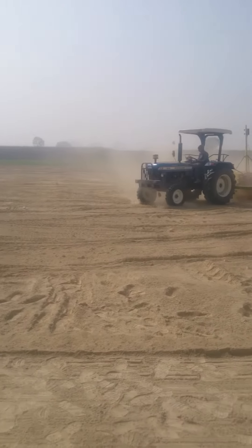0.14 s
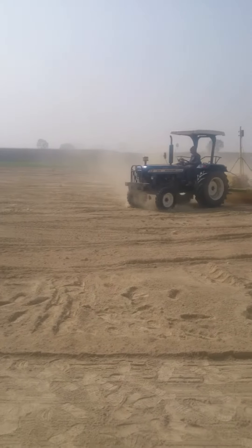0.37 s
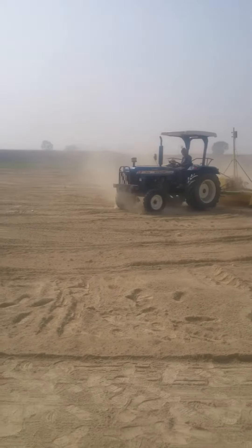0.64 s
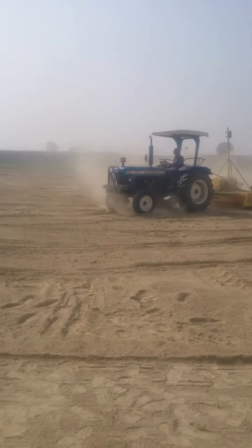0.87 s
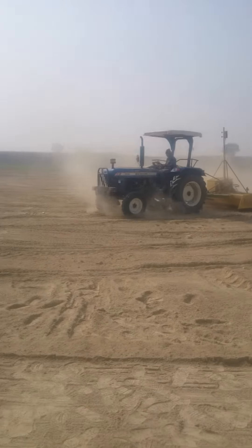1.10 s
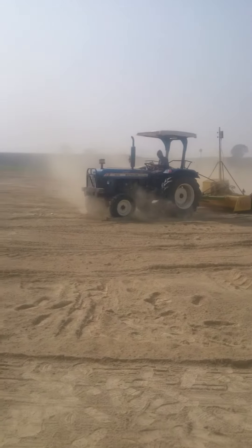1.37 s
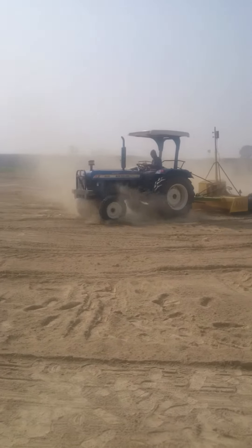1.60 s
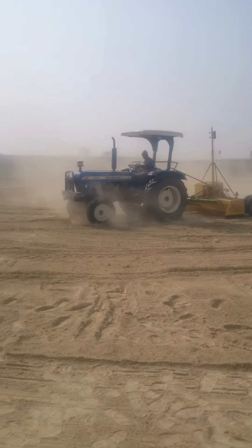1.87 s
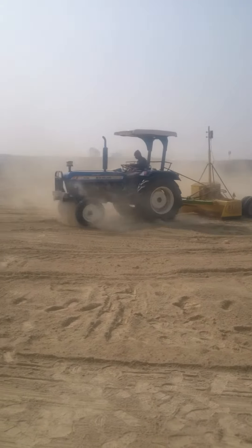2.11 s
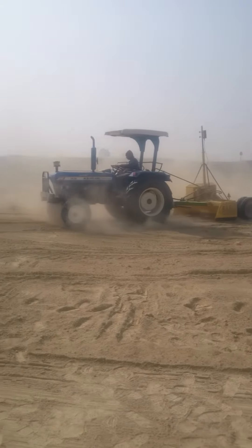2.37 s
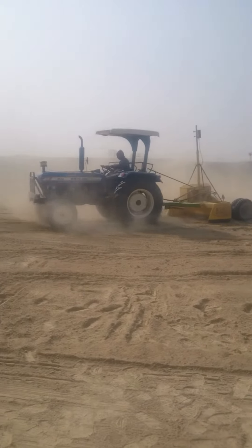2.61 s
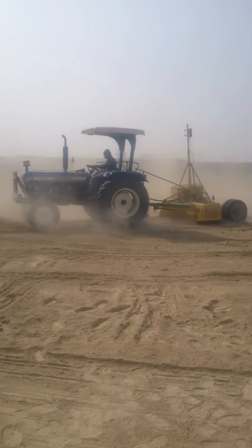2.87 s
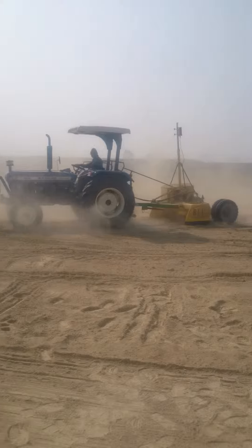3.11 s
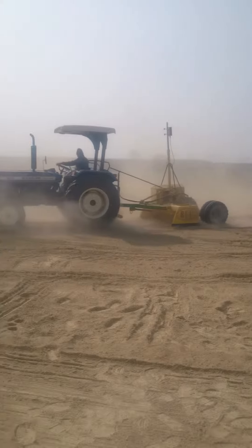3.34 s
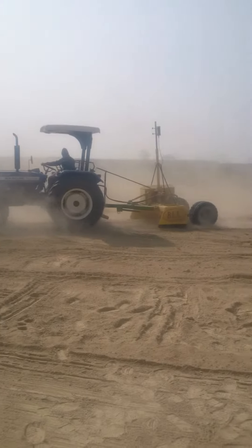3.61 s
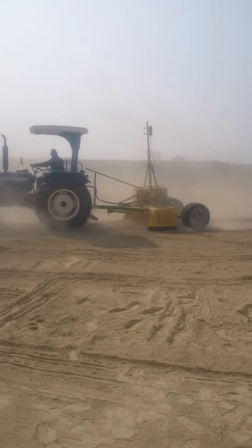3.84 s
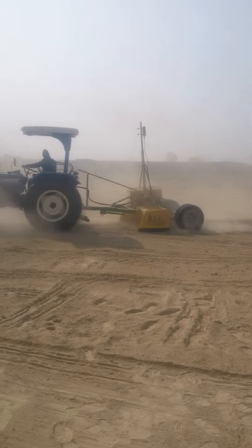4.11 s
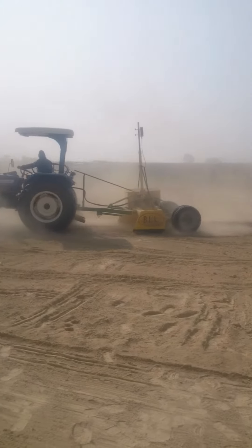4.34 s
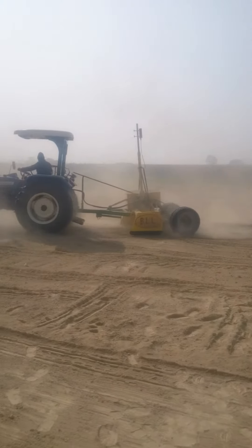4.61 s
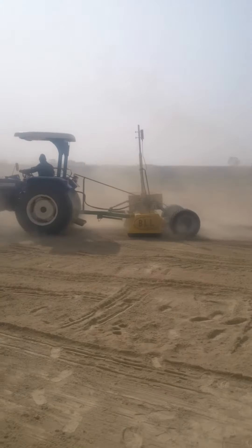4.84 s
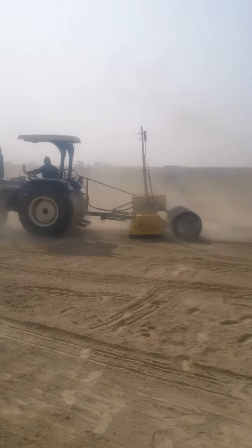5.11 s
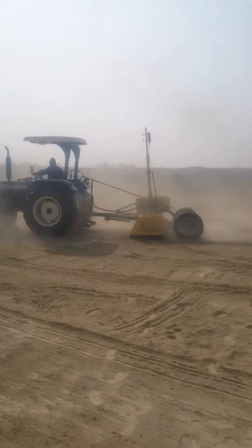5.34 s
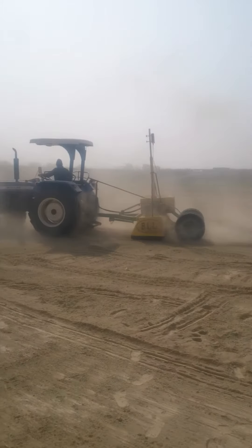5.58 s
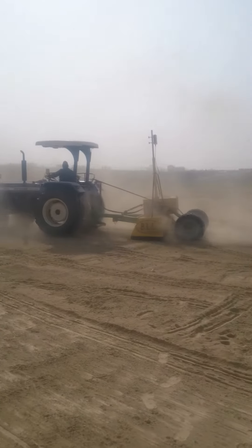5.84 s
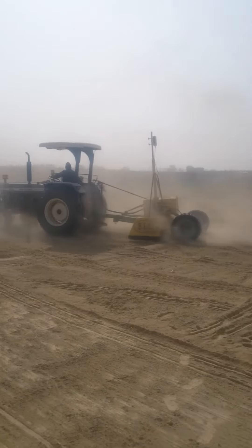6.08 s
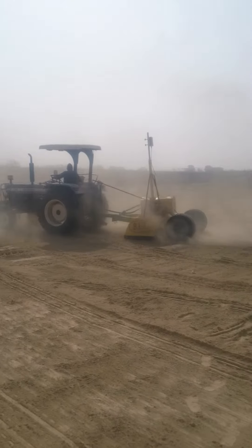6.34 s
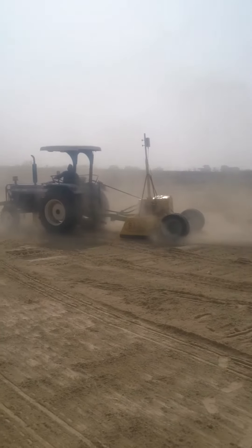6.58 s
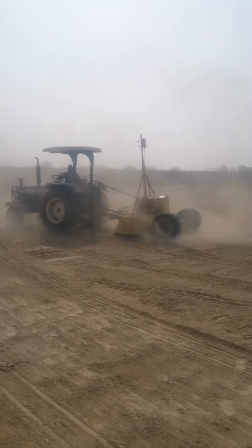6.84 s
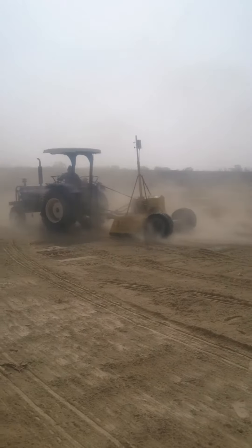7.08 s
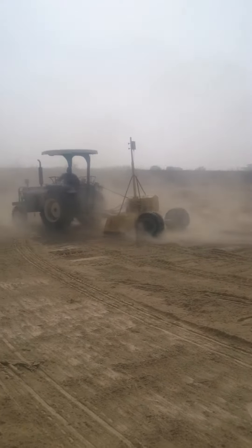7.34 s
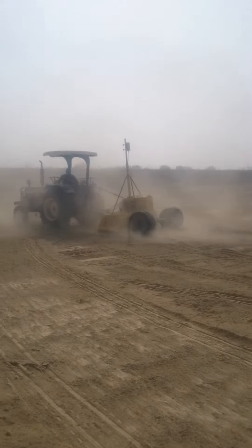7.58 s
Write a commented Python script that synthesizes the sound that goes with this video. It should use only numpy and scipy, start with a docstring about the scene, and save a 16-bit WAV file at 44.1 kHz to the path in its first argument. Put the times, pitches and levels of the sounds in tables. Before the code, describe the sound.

Low wind rumble and blunt buffets dominate the right channel, while the left holds a clearer, quieter tractor. Its diesel engine chatters quickly and evenly under load, with a droning exhaust tone, ringing panels and thin gear whine strongest as it passes in the middle. The wind lulls there, then builds again as the tractor turns away, its hitch pins clinking. Handheld stereo microphone, dry open air.

```python
"""Tractor drive-by in wind

A three-cylinder diesel tractor drags a levelling blade past across an open field.
Clatter: noise pulsed by each firing, coloured by ringing panels. Engine-locked tones and gear whines: sines.
Hitch clinks: clusters of decaying sines. Wind: noise read at air speed, plus short slaps of air.
Two microphone ports hear it, the right far more exposed to wind; a limiter rounds the peaks."""
import sys
import numpy as np
from scipy import signal
from scipy.fft import rfft, irfft
from scipy.io import wavfile
from scipy.ndimage import uniform_filter1d, minimum_filter1d

SR = 44100
rng = np.random.default_rng(int(sys.argv[2]) if len(sys.argv) > 2 else 0)


def invert_db(level):
    """Linear amplitude ratio for a level in decibels (20 dB per decade), elementwise."""
    return 10 ** (np.asarray(level, dtype=float) / 20)


def transcribe(u):
    """Save the signal u as a 16-bit wav file named by the first command-line argument.

    u: samples, shape (n,) or (channels, n), limited to [-1, 1]; the rate is SR.
    q: integer samples, one column per channel.
    """
    v = np.clip(np.atleast_2d(u).T, -1, 1)
    q = np.round(v * 32767).astype(np.int16)
    wavfile.write(sys.argv[1], SR, q)


N = 339570
T = np.arange(N) / SR  # s

# engine speed, sinking as the tractor passes: t/s, four-stroke cycles per second/Hz
ENGINE_SPEED = [(0, 15.56), (.6, 15.55), (1.1, 15.47), (2, 15.448), (3.5, 15.435), (4.5, 15.405),
                (5.5, 15.375), (6.1, 15.34), (6.6, 15.305), (7.7, 15.31)]
# mean strength of each cylinder's firing: level/dB
CYLINDER_DB = [-3, -1, -1.5]
# loud engine-locked tones, exhaust orders 6, 9, 12 and a fan or gear whine at 32:
# multiple of the engine cycle
LOUD_MULTIPLES = [6, 9, 12, 32]
# lobe of each loud multiple sweeping the listener:
# arriving level/dB, leaving level/dB, swell/dB, lobe t/s, half-width/s
LOBES = [(-25, -27, 3, 4.7, 1.0), (-40, -42, 9.5, 3.5, 2.0), (-42, -41.5, 9, 3.1, 1.1),
         (-48, -54, 14.5, 3.5, .9)]
# weaker engine-locked tones: multiple of the engine cycle, level/dB
WEAK_MULTIPLES_DB = {11: -44, 15: -44, 18: -47, 21: -54, 26: -52, 27: -64, 30: -54, 36: -56, 39: -61, 42:
                     -60, 48: -53, 52: -59, 56: -59, 66: -61, 72: -57, 74.67: -57}
# common gain of the weaker multiples as the tractor turns: t/s, level/dB
WEAK_FACING = [(0, -6), (1.2, -4), (2.2, 1), (4.8, 1), (6, -2), (6.6, -6), (7.7, -7)]
# gear whines: f/Hz, level/dB, loudest t/s, half-width/s
GEAR_WHINES = [(1235, -60, 2.1, .5), (1365, -57, 3.4, 1.6), (1790, -59, 3.2, 1.2), (825, -55, 3.4, 1.3)]
# body panels that ring while facing the listener:
# arriving f/Hz, leaving f/Hz, width/Hz, level/dB, facing t/s, half-width/s
PANELS = [(760, 745, 13, 5, 3.8, 1.7), (846, 835, 29, 5, 3.97, 1.2), (980, 950, 35, 8.5, 4.59, 2.2),
          (1170, 1167, 13, 8, 0.95, 1.55), (1206, 1300, 37, 6.5, 2.1, 0.46),
          (1385, 1310, 36, 6.5, 5, 2.205), (1536, 1400, 35, 8, 0.73, 1.3), (1700, 1820, 42.1, 5, 3.9, 1.6),
          (2150, 2170, 34, 13, 6.24, 2), (2450, 1530, 40, 2.5, 6.3, 1.097),
          (2560, 2796, 86, 5.5, 3.8, 0.92), (2600, 3400, 360, 7, 0.091, 0.53),
          (2810, 2770, 50, 6, 6.1, 2.71), (3146, 3080, 27, 9.5, 2.3, 0.91), (3338, 3290, 76, 6.5, 5.9, 1.2),
          (2610, 2620, 60.4, 4, 2.3, .6), (3630, 3650, 72, 5.5, 2.3, .9)]
# clatter colour change from nose to tail: f/Hz, level/dB
NOSE_TO_TAIL = [(700, -1), (1250, -3.5), (1900, -1.5), (2700, 1), (5000, 0), (9000, -0.5)]
# hitch clinks: t/s, level/dB, gain of rings above 6 kHz/dB, hardest-struck f/Hz
CLINKS = [(0.059, -32.5, 11.5, 3750), (2.034, -33, 0, 3300), (2.5557, -33, 0, 3100), (4.0503, -37, 0, 3500),
          (5.8584, -31.5, -2.5, 3750), (6.4768, -31.5, 3, 3400), (7.2479, -32.5, 6, 3300),
          (7.269, -31, 0, 2900), (7.364, -24, -4, 3560), (7.381, -28, -6, 3293)]
# rings of the hitch pins: f/Hz, level/dB, 60 dB decay time/s
HITCH_RINGS = [(2790, 2, 0.06), (3120, 0, 0.05), (3330, -2, 0.09), (3480, -3, .05), (3670, 2, 0.077),
               (3800, -3, 0.062), (4500, -4, .025), (4870, -3, .03), (6570, -15, .04), (6870, -13, 0.088),
               (7680, -26, .04), (11300, -28, .04)]
# colour of the clatter at each port: f/Hz, level/dB
LEFT_PORT = [(90, 2.5), (300, 1), (500, 5), (700, -4.5), (820, 2), (1050, 2), (1440, 2), (1870, -2),
             (2560, -1), (2850, -4.5), (3150, -1.5), (3400, -3), (4900, -5), (5400, -16.5), (6870, -13),
             (7750, -16.5), (8960, -10.5), (10110, -19.5), (11680, -32), (15600, -34)]
RIGHT_PORT = [(90, 5), (300, 6), (500, 7), (740, 5), (900, 1), (1150, 8), (1370, 7.5), (1550, -1.5),
              (1760, 8), (2010, -0.5), (2160, 3), (2750, 3.5), (3050, 2), (3860, 0), (4560, -9.5),
              (5530, -18.5), (7390, -20), (9180, -23), (12550, -22), (15600, -27.5)]
# phase by which left leads beyond the travel delay: f/Hz, phase/rad
LEFT_LEAD = [(60, 3.0), (500, 2.1), (650, 1.9), (750, 3.3), (850, 2.7), (950, 1.2), (1050, 1.85),
             (1450, 2.3), (1650, 1.0), (1900, 2.9), (2050, 5.9), (2250, 6.8), (3000, 6.4), (4300, 6.2),
             (5300, 4.9), (7000, 4.5)]
# left-right likeness of the clatter: f/Hz, share/1
LIKENESS = [(400, 0.98), (1200, 0.92), (1900, 0.57), (2600, 0.75), (4700, 0.59), (5700, 0.28), (9000, 0.08),
            (15000, 0.22)]
# stretch of the right port's spectrum as the tractor swings round: t/s, frequency factor/1
RIGHT_SLIDE = [(0, 0.96), (2, 0.98), (3.2, 0.98), (5, 1.025), (7.7, 1)]
# slaps of air on the right port: peak t/s, level/dB, f/Hz
SLAPS = [(0.0308, -3.5, 287), (0.1072, -11.5, 308), (0.1443, -15, 430.0), (0.158, -6.5, 169),
         (0.3158, -10.5, 169), (0.38, -11.5, 230.6), (0.449, -9.5, 210.0), (0.549, -8, 325.9),
         (0.6557, -9.5, 228), (0.6977, -2, 222.1), (0.8047, -7, 308), (0.8753, -8, 279.5),
         (0.9358, -10, 420.2), (0.9436, -5.5, 169), (0.9983, -4, 255), (1.015, -5, 249.2),
         (1.0378, -4, 169.7), (1.0533, -9.5, 400.0), (1.0828, -3, 250.0), (1.1176, -12, 308),
         (1.1284, -6, 230.0), (1.1414, -9, 380.0), (1.16, -2.5, 171), (1.1839, -8, 229.8),
         (1.1967, -11, 388), (1.3467, -4.5, 246), (1.381, -11, 419), (1.414, -12, 376), (1.4601, -4, 379.7),
         (1.5147, -5.5, 310.4), (1.53, -4, 250.3), (1.59, -4.5, 274), (1.6356, -8, 247.8),
         (1.7046, -5, 249.8), (1.744, -6.5, 230.3), (1.8133, -12, 335), (1.8257, -10, 169.9),
         (1.886, -13, 309.5), (1.9118, -7.5, 205.2), (2.5057, -8.5, 308), (2.6237, -8, 172),
         (2.6552, -11.5, 306), (2.916, -5.5, 169), (2.9599, -8, 229), (3.079, -9.5, 190.3),
         (3.7135, -11.5, 330), (4.5078, -11, 169.9), (4.8326, -8, 615.4), (4.836, -8.5, 170),
         (4.876, -12, 376), (4.938, -11, 234), (4.9926, -8, 230.4), (5.0116, -15, 620.0),
         (5.1043, -6.5, 373), (5.1181, -6.5, 455), (5.1743, -4, 251), (5.1887, -12, 379),
         (5.269, -11, 510.4), (5.293, -9, 249.4), (5.3082, -7, 310.0), (5.3806, -12, 283),
         (5.5685, -12, 468), (5.5849, -11, 381.7), (5.5953, -14, 419), (5.6604, -6, 457),
         (5.7002, -7.5, 520), (5.7242, -10, 421.3), (5.7405, -7.5, 314), (5.7582, -8.5, 169.6),
         (5.7954, -7, 230.0), (5.8346, -9, 207.9), (5.8369, -14, 559.6), (6.009, -8, 340),
         (6.0355, -5, 245), (6.1114, -11, 169.3), (6.1288, -17, 459.7), (6.1565, -11.5, 381),
         (6.2263, -8, 246.1), (6.243, -12, 312), (6.2642, -12, 309), (6.3864, -7.5, 382.2),
         (6.4132, -8.5, 280.7), (6.4962, -4, 209.7), (6.5091, -8.5, 281), (6.5484, -12, 419.3),
         (6.5668, -5, 280.0), (6.5834, -6, 519.6), (6.5976, -5, 372), (6.6663, -6.5, 420.4),
         (6.6995, -2, 169), (6.7336, -7, 280.3), (6.7924, -4.5, 341.6), (6.8242, -2.5, 224.2),
         (6.8817, -15, 429), (6.9134, -6.5, 509), (6.951, -20, 450.5), (6.969, -4, 280.0),
         (6.975, -12.5, 521), (7.004, -15, 339.8), (7.044, -10.5, 559.4), (7.085, -15, 400.0),
         (7.1024, -3, 421.3), (7.1256, -14, 620.0), (7.17, -12.5, 419.6), (7.1857, -6.5, 519.4),
         (7.2265, -6, 336), (7.253, -8, 210.4), (7.2696, -7, 305), (7.3074, -12, 379.6),
         (7.3181, -6, 249.4), (7.345, -8, 380.0), (7.362, -10, 337.5), (7.4951, -5, 327.4),
         (7.5604, -13.5, 380), (7.579, -9, 369), (7.596, -7.5, 173)]
# puffs of stronger wind at the right port: peak t/s, level/dB, length/s
PUFFS = [(0.022, -11.5, 0.045), (0.115, -11, 0.063), (0.321, -14, 0.04), (0.375, -14, 0.035),
         (0.449, -12.5, 0.043), (0.538, -13, 0.027), (0.611, -14, 0.039), (0.693, -12, 0.064),
         (0.94, -12, 0.043), (1.138, -10.5, 0.097), (1.379, -10.5, 0.061), (1.519, -10, 0.044),
         (1.599, -10.5, 0.0505), (1.736, -14, 0.049), (1.814, -10, 0.043), (1.899, -14, 0.047),
         (2.433, -18, .04), (2.506, -14, 0.051), (2.619, -13, 0.038), (2.665, -14, 0.041),
         (2.951, -12, .11), (3.109, -15.5, 0.066), (3.228, -18.5, 0.059), (3.35, -18, 0.073),
         (3.643, -16.5, 0.039), (3.725, -15, 0.07), (3.899, -17, 0.075), (4.064, -14, .03),
         (4.322, -18, 0.046), (4.507, -18, 0.049), (4.99, -15, 0.049), (5.124, -13, 0.0509),
         (5.188, -13, 0.0409), (5.289, -14, 0.049), (5.371, -13, 0.085), (5.597, -13, 0.063),
         (5.747, -10, 0.05), (5.839, -15, 0.04), (6.103, -12, 0.1), (6.26, -14.5, 0.062),
         (6.418, -14, 0.063), (6.713, -12.5, 0.071), (6.971, -11, 0.099), (7.183, -10.5, 0.057),
         (7.321, -14, 0.047), (7.493, -11, 0.034), (7.586, -8.5, 0.033)]
# breeze under the puffs: t/s, right port level/dB, sheltered left port level/dB
BREEZE = [(0, -17, -31), (.3, -15.5, -36), (.74, -17, -35), (.77, -24, -35), (.83, -12, -33),
          (1.2, -11, -28), (1.28, -18, -35), (1.6, -13, -27.5), (1.95, -15.5, -34), (2.05, -23, -34.5),
          (2.75, -22, -34), (3.4, -21, -31), (3.85, -20.5, -27.5), (4.79, -24, -26), (4.84, -15.5, -27),
          (5.07, -19, -27), (5.7, -14, -29.5), (5.9, -17.5, -33.5), (6.3, -16.5, -27), (6.5, -13, -28.5),
          (7.3, -13, -29), (7.42, -21, -30), (7.7, -20, -31)]
# spectrum of the eddies passing at unit speed, relative: f/Hz, level/dB
EDDIES = [(15, -8), (40, -6), (62, 3), (110, 2), (200, -6.5), (350, -16.5), (600, -29), (1000, -45),
          (2000, -79)]

START_CYCLES, HUNT_SHARE = .93, .0012  # place in the cycle at t = 0; governor hunting, rms of speed
CLOSEST_S, CLOSEST_DB = 3.51, -32.5
CROSSING_S = 3.5  # time to drive the closest distance
WHINE_WANDER_SHARE, WHINE_BLUR_SHARE = .008, .003  # slow and quick, rms of pitch
STRIKE_REACH_HZ, STRIKE_FALL_DB = 450, -8.5  # rings far from the struck pitch are weaker
RIGHT_DELAY_S = 14 / SR
SLAP_SIGMA_CYCLES, WAKE_CYCLES = .48, 2.5  # wake dies by 1/e in WAKE_CYCLES
PUSH_SHARE, WAKE_SHARE = .78, .2
RISE_SHARE, FALL_SHARE = .45, .55  # of puff length
ROAR_DB, ROAR_DB_PER_DB = -24.5, 1.5  # level in a -15 dB gust; growth with the gust
LEE_WAVER_DB = 1.55  # rms


def evened(x):
    """Scales to rms 1."""
    return x / np.sqrt(np.mean(x ** 2) + 1e-20)


def read(points, hz):
    """Reads a spectrum table on a log-frequency axis."""
    f, value = np.transpose(points)
    return np.interp(np.log(hz + 1), np.log(f + 1), value)


def curves(rows):
    """One signal per column of a time table."""
    s, *columns = np.transpose(rows)
    return [np.interp(T, s, c) for c in columns]


def add(mix, start_s, sound):
    """Mixes a sound in at start_s."""
    part = mix[round(start_s * SR):][:len(sound)]
    part += sound[:len(part)]


def wander(fastest_hz, slowest_hz):
    """Slow chance, rms 1: sines of random phase, weaker towards fastest_hz."""
    t = np.arange(0, N / SR + .01, .001)
    f = np.geomspace(slowest_hz, fastest_hz, num=40)[:, None]
    sines = np.sin(2 * np.pi * (f * t + rng.random(f.shape)))
    return np.interp(T, t, evened((sines / np.sqrt(f)).sum(0)))


def at_ports(hz, db, turns):
    """Tone near hz, delayed, phase-shifted and coloured at the right port; db is the left rms."""
    lag = read(LEFT_LEAD, hz) + 2 * np.pi * hz * RIGHT_DELAY_S
    right_db = read(RIGHT_PORT, hz) - read(LEFT_PORT, hz)
    phase = 2 * np.pi * (turns + rng.random()) - np.array([[0], [lag]])
    return np.sqrt(2) * invert_db(db + np.array([[0], [right_db]])) * np.cos(phase)


def clatter(cycles):
    """Each firing knocks the block alike and lifts a steady hiss in a burst that decays."""
    firings = len(CYLINDER_DB) * cycles
    count = np.floor(firings).astype(int)
    uneven_db = 3.2 * np.clip(rng.standard_normal(count[-1] + 1), -2, 1.5)
    strength = invert_db(np.take(CYLINDER_DB, count, mode="wrap") + uneven_db[count])
    since = firings - count  # in firing intervals
    burst = 0.9 + 0.61 * strength * (1 - np.exp(-since / 0.028)) * np.exp(-since / 0.56)
    ring = rng.standard_normal(2000) * invert_db(-60 * T[:2000] / 0.044)
    ring = signal.lfilter(*signal.butter(1, 1800, fs=SR), ring)  # the repeatable part is dull
    strikes = np.diff(count, prepend=count[0]) * strength
    knocks = evened(signal.oaconvolve(strikes, ring)[:N])
    hiss = evened(burst * rng.standard_normal((2, N))) * invert_db(0.4 * wander(20, 1.5))
    return hiss[0] + invert_db(-17) * knocks, hiss[1]


def panels_db(hz, t):
    """Narrow resonances that drift and flutter in pitch, and come and go as the body turns."""
    total_db = 0
    for arriving_hz, leaving_hz, width_hz, db, facing_s, half_s in PANELS:
        flutter_hz = 8 * np.interp(t, T, wander(3.1, 0.2941))
        centre_hz = arriving_hz + (leaving_hz - arriving_hz) * t / t[-1] + flutter_hz
        peak = 1 / (1 + (2 * (hz[:, None] - centre_hz) / width_hz) ** 2)
        total_db = total_db + db * np.exp(-((t - facing_s) / half_s) ** 2) * peak
    return total_db


def through_ports(near, other, patchy_db):
    """Colours the clatter per port; right also hears an unrelated part, and its ripples drift."""
    hz, t, (a, b) = signal.stft(np.array([near, other]), SR, nperseg=2048, noverlap=1536)
    slid_hz = hz[:, None] / np.interp(t, *np.transpose(RIGHT_SLIDE))
    same = np.clip(read(LIKENESS, slid_hz), 0, 1)
    lag = np.exp(-1j * (read(LEFT_LEAD, slid_hz) + 2 * np.pi * hz[:, None] * RIGHT_DELAY_S))
    # random level patches over time and frequency
    patches = rng.standard_normal((2,) + a.shape[::-1])
    patches = uniform_filter1d(uniform_filter1d(patches, size=60, axis=1), size=3, axis=2)
    patches = evened(patches).transpose(0, 2, 1)
    turned_db = read(NOSE_TO_TAIL, hz)[:, None] * (t / t[-1] - .5) + panels_db(hz, t)
    left = a * invert_db(read(LEFT_PORT, hz))[:, None]
    right = (same * a * lag + np.sqrt(1 - same ** 2) * b) * invert_db(read(RIGHT_PORT, slid_hz))
    z = np.array([left, right]) * invert_db(patchy_db * patches + turned_db)
    return signal.istft(z, nperseg=2048, noverlap=1536)[1][:, :N]


def loud_tones_db():
    """Each loud multiple beams its own way: it drifts in level, with a swell as its lobe passes."""
    return [arriving_db + (leaving_db - arriving_db) * T / T[-1]
            + swell_db * np.exp(-((T - lobe_s) / half_s) ** 2)
            for arriving_db, leaving_db, swell_db, lobe_s, half_s in LOBES]


def engine_tones(cycles, loud_db):
    """Engine-locked tones of exhaust, fan and gears; the weaker ones waver and fade together."""
    levels = list(zip(LOUD_MULTIPLES, loud_db))
    facing_db = curves(WEAK_FACING)[0]
    for multiple, db in WEAK_MULTIPLES_DB.items():
        levels.append((multiple, db + facing_db + 3.0 * wander(2.5, .2)))
    mean_hz = cycles[-1] / T[-1]
    return sum(at_ports(k * mean_hz, db, k * cycles) for k, db in levels)


def gears():
    """Thin whines that wander with the load, flutter, and fade either side of their loudest moment."""
    out = np.zeros((2, N))
    for hz, db, loudest_s, half_s in GEAR_WHINES:
        level_db = db - 8.68 * ((T - loudest_s) / half_s) ** 2 + 3.01 * wander(7.1, 0.51)
        drift = WHINE_WANDER_SHARE * wander(1.5, .2) + WHINE_BLUR_SHARE * wander(30, 5)
        out += at_ports(hz, level_db, np.cumsum(hz * (1 + drift)) / SR)
    return out


def clinks():
    """Loose steel pins: clusters of quickly dying rings, each blow landing on its own spot."""
    out, t = np.zeros((2, N)), T[:4000]
    onset = 1 - np.exp(-(t / 0.0019) ** 2)
    for start_s, db, high_db, struck_hz in CLINKS:
        rattle = 1 + 0.5 * evened(uniform_filter1d(rng.standard_normal(len(t)), size=90))
        for hz, ring_db, t60_s in HITCH_RINGS:
            miss = 1 - np.exp(-((hz - struck_hz) / STRIKE_REACH_HZ) ** 2)
            spot_db = high_db if hz > 6000 else STRIKE_FALL_DB * miss
            decay = invert_db(ring_db + spot_db + rng.normal(0, 2.1) - 60 * t / t60_s)
            ring = decay * np.sin(2 * np.pi * (hz * rng.normal(1, 0.004) * t + rng.random()))
            ring = invert_db(db) * 0.5 * ring * rattle * onset
            right_db = 4.5 + read(RIGHT_PORT, hz) - read(LEFT_PORT, hz)
            add(out[0], start_s, ring)
            add(out[1], start_s + RIGHT_DELAY_S, invert_db(right_db) * ring)
    return out


def slaps():
    """Push and pull of the membrane amid turbulence; also how far each crowds out steady flow."""
    out, crowd = np.zeros(N), np.zeros(N)
    lead_s = T[500]
    t = T[:2500] - lead_s
    turns = rng.random(len(SLAPS))
    noises = rng.standard_normal((len(SLAPS), len(t)))
    for (peak_s, db, hz), turn, noise in zip(SLAPS, turns, noises):
        bell = np.exp(-.5 * (t * hz / SLAP_SIGMA_CYCLES) ** 2)
        band = signal.butter(3, [.5 * hz, 1.186 * hz], "band", fs=SR, output="sos")
        stir = evened(signal.sosfilt(band, noise))
        # turbulence builds faster than it dies
        wake = stir * np.exp(-abs(t) * hz / np.where(t < 0, 0.47 * WAKE_CYCLES, WAKE_CYCLES))
        push = bell * np.cos(2 * np.pi * (hz * t - turn))
        add(out, peak_s - lead_s, invert_db(db) * (PUSH_SHARE * push + WAKE_SHARE * wake))
        add(crowd, peak_s - lead_s, bell)
    return out, np.minimum(crowd, 1)


def gusts_db(breeze_db):
    """Bell-shaped puffs add their power to the breeze."""
    power = invert_db(2 * breeze_db)
    for peak_s, db, length_s in PUFFS:
        width_s = length_s * np.where(T < peak_s, RISE_SHARE, FALL_SHARE)
        power = power + invert_db(2 * db) * np.exp(-((T - peak_s) / width_s) ** 2)
    return 10 * np.log10(power)


def wind(level_db, calm_speed, per_db, lumpy):
    """A frozen train of eddies is read past the port; swirl varies its speed (pitch) and strength."""
    swirl_band = signal.butter(2, [9, 60], "band", fs=SR, output="sos")
    swirl = evened(signal.sosfilt(swirl_band, rng.standard_normal(N)))
    gust = per_db * (uniform_filter1d(level_db, size=6000) + 25)
    speed = calm_speed * np.exp(gust + lumpy * np.tanh(swirl / 2) * 2)
    hz = np.fft.rfftfreq(4 * N, 1 / SR)
    train = irfft(rfft(rng.standard_normal(4 * N)) * invert_db(read(EDDIES, hz)))
    place = np.cumsum(np.clip(speed, .1, 3.9))  # in samples of the train
    passing = np.interp(place, np.arange(4 * N), train) * invert_db(1.92 * swirl)
    passing = signal.sosfilt(signal.butter(1, 35, "high", fs=SR, output="sos"), passing)
    power = uniform_filter1d(uniform_filter1d(passing ** 2, size=2600), size=2600)
    steady = passing / np.sqrt(power)  # level_db alone sets the slow strength
    return invert_db(level_db) * evened(steady)


def scene():
    """The tractor passes on a straight line; wind blows on each port separately."""
    cycles = START_CYCLES + np.cumsum(curves(ENGINE_SPEED)[0] * (1 + HUNT_SHARE * wander(4, .5))) / SR
    body = through_ports(*clatter(cycles), patchy_db=2.0)
    nearness = invert_db(CLOSEST_DB) / np.sqrt(1 + ((T - CLOSEST_S) / CROSSING_S) ** 2)
    tones = engine_tones(cycles, loud_tones_db())
    tractor = nearness * body / body[0].std() + tones + gears() + clinks()
    right_db, left_db = curves(BREEZE)
    lee = wind(left_db + LEE_WAVER_DB * wander(6, 1.5), calm_speed=.92, per_db=.02, lumpy=.3)
    slap, crowd = slaps()
    gust_db = gusts_db(right_db)
    # roar: small fast eddies
    roar = wind(ROAR_DB + ROAR_DB_PER_DB * (gust_db + 15), calm_speed=1.5, per_db=.02, lumpy=.2)
    flow = wind(gust_db, calm_speed=.56, per_db=-0.0149, lumpy=.13)  # stronger gusts read slower
    exposed = roar + flow * (1 - 0.33 * crowd) + slap
    return tractor + np.array([lee, exposed])


def top_cut(x):
    """Nothing passes above the cut-off."""
    return signal.sosfilt(signal.butter(12, 15770, fs=SR, output="sos"), x)


def record(dry):
    """Steep bass cut, then a look-ahead limiter per channel: quick drop, slow recovery."""
    x = signal.sosfilt(signal.butter(5, 52, "high", fs=SR, output="sos"), dry)
    over_db = np.maximum(20 * np.log10(abs(x) + 1e-9) + 1.41, 0)  # above -1.41 dB
    recovery_db = T * 60.  # 60 dB/s
    held_db = np.maximum.accumulate(over_db + recovery_db, axis=1) - recovery_db
    ahead_db = -minimum_filter1d(-held_db, size=129, axis=1)
    limited = x / invert_db(uniform_filter1d(ahead_db, size=65, axis=1))
    return top_cut(limited)


dry = scene()
out = record(dry)
transcribe(out)
```